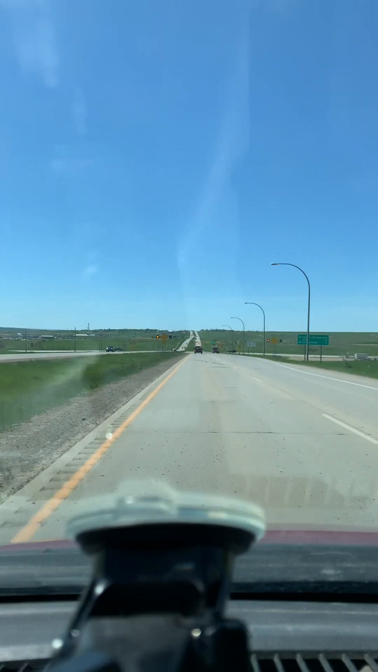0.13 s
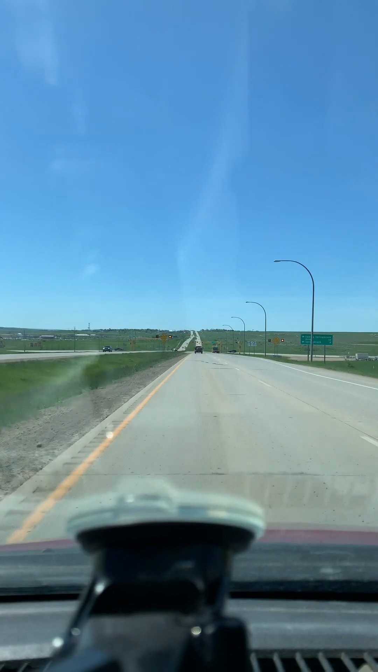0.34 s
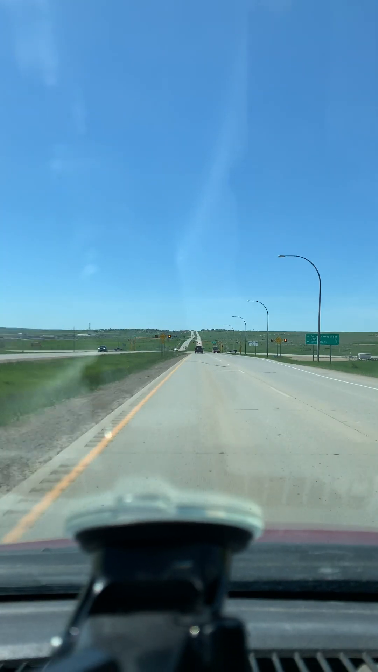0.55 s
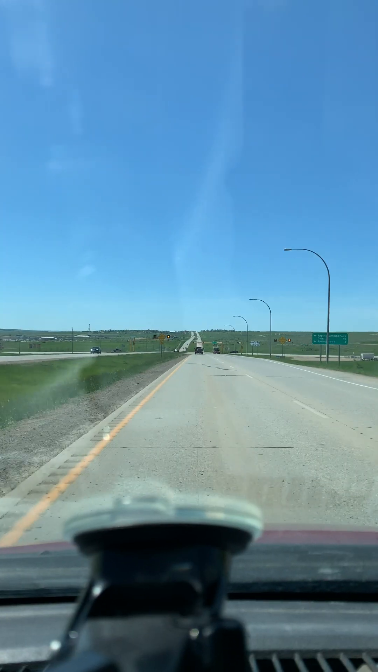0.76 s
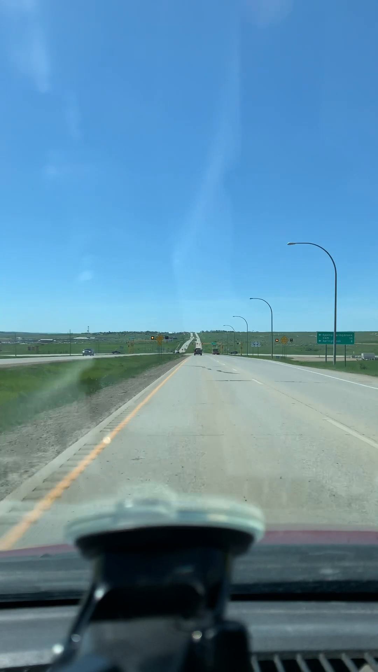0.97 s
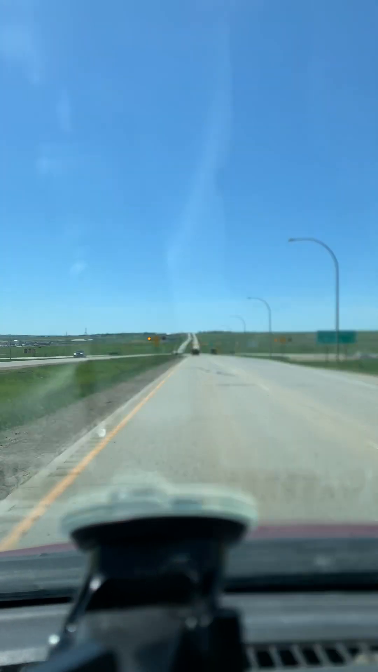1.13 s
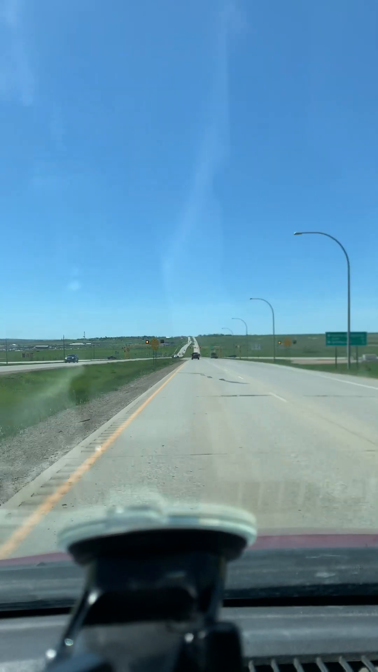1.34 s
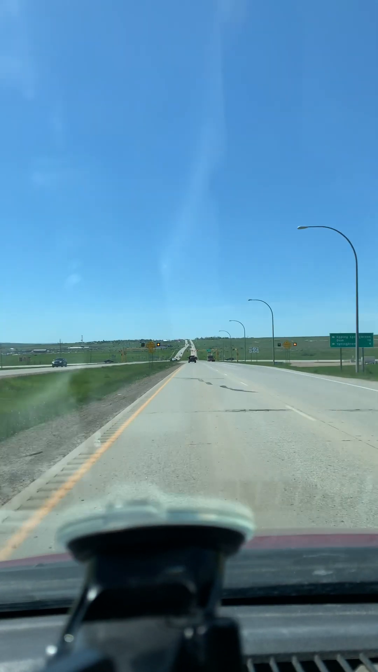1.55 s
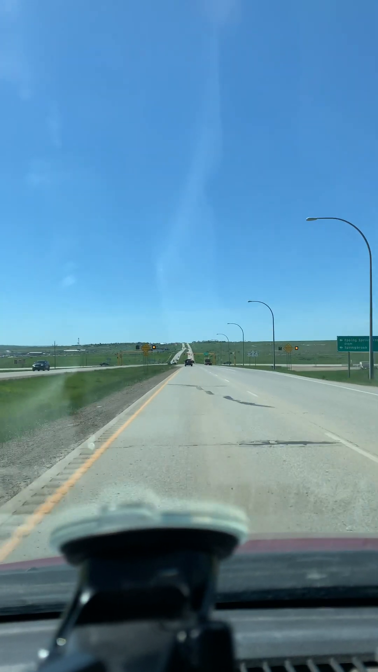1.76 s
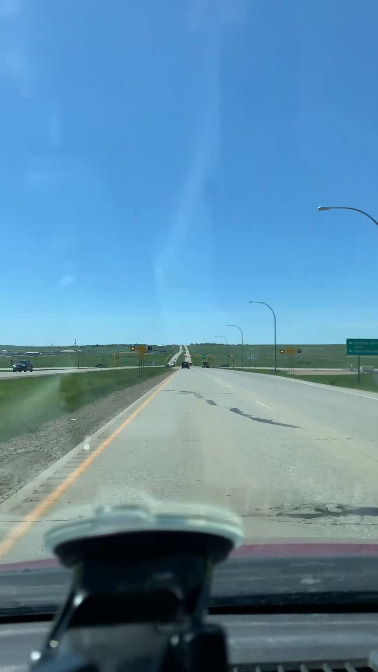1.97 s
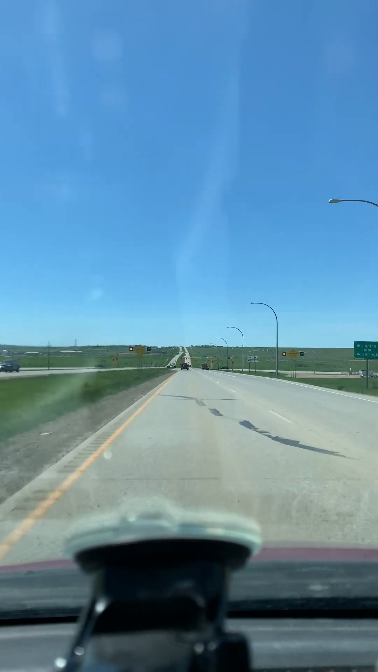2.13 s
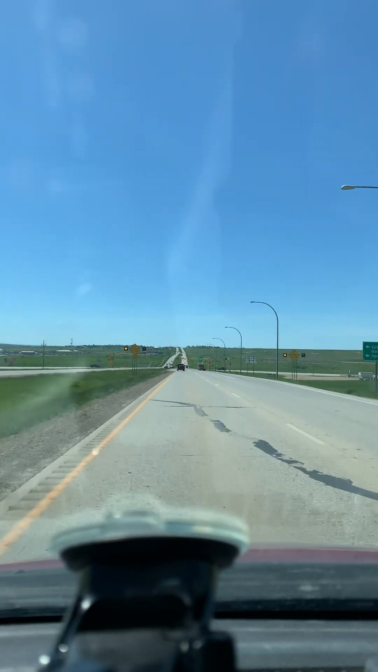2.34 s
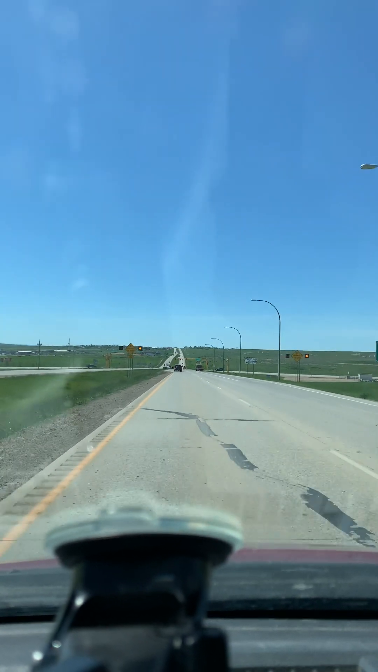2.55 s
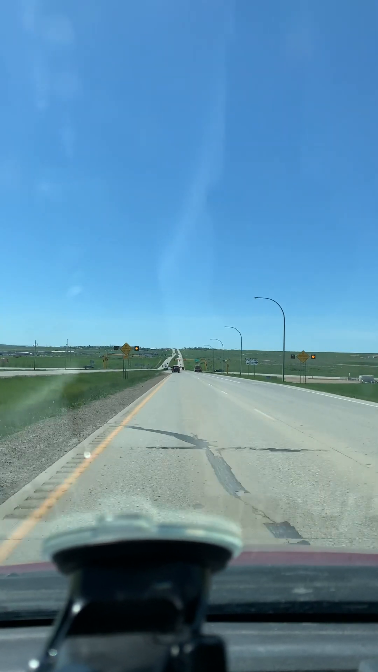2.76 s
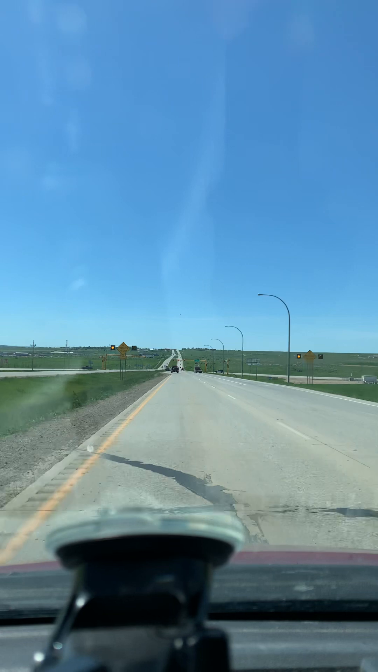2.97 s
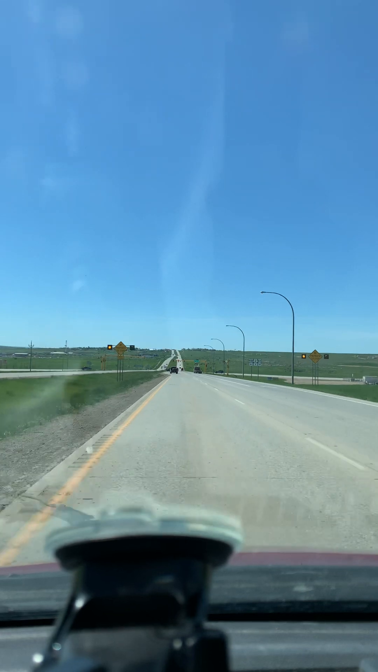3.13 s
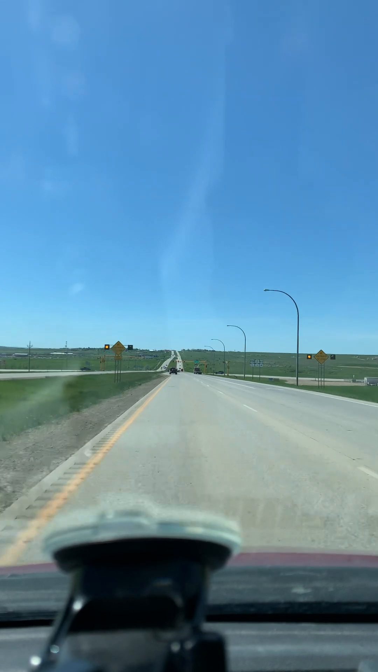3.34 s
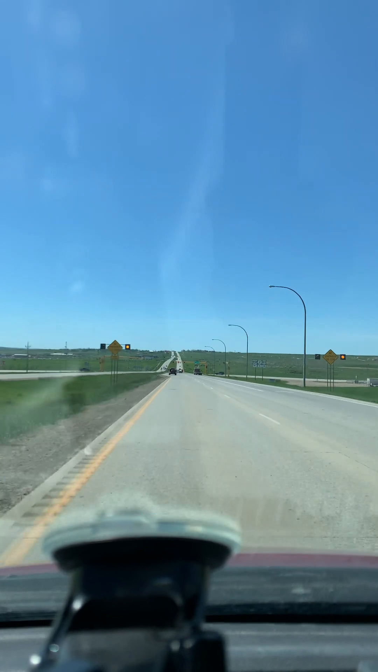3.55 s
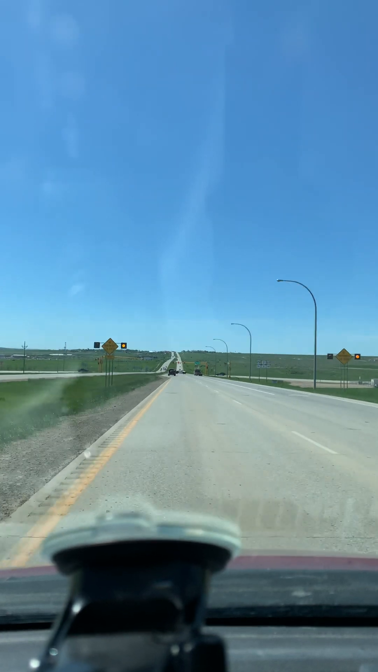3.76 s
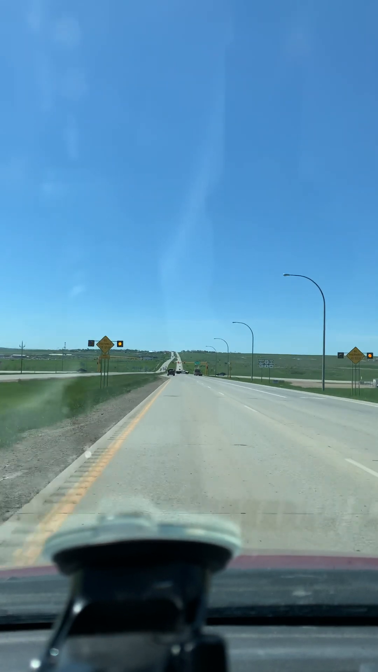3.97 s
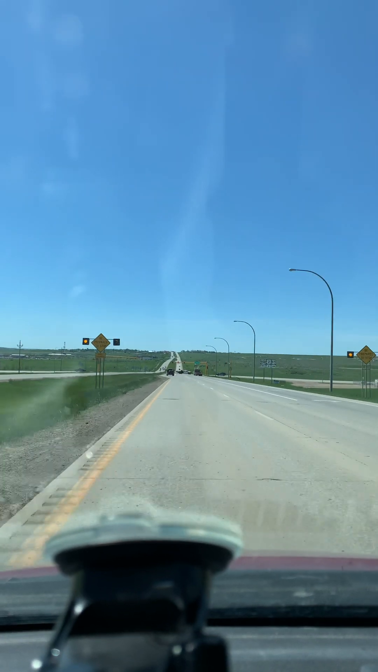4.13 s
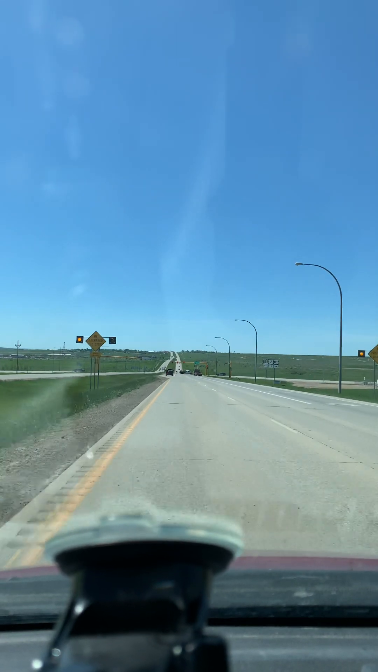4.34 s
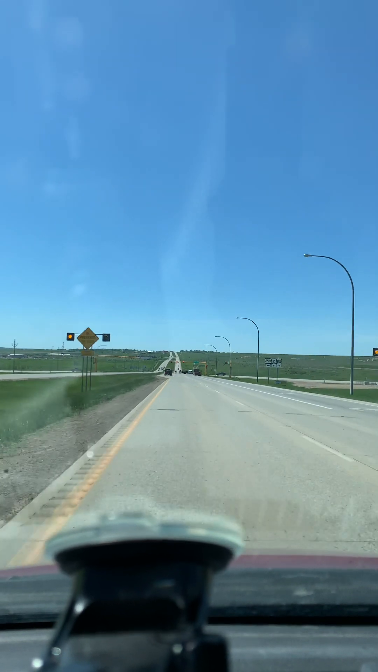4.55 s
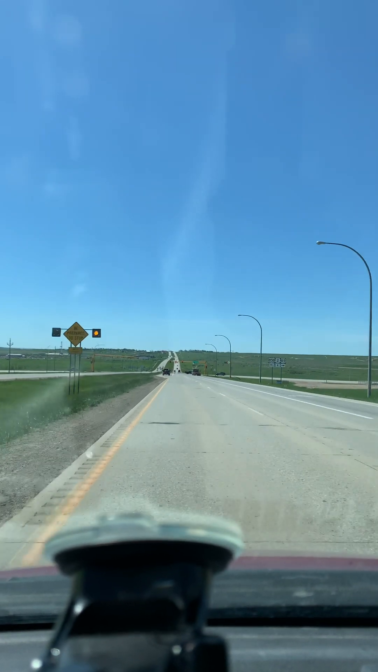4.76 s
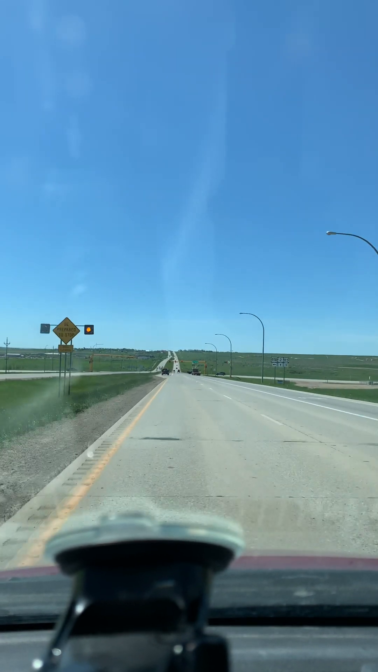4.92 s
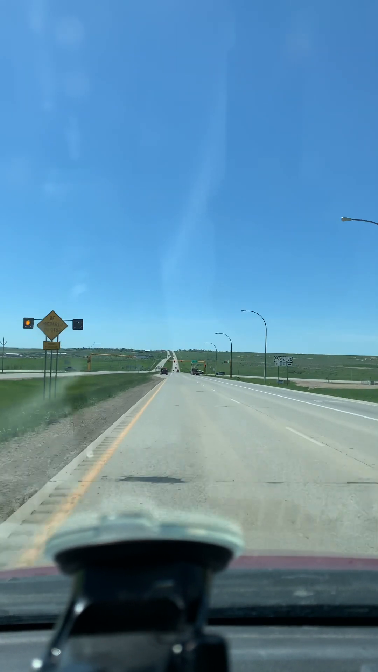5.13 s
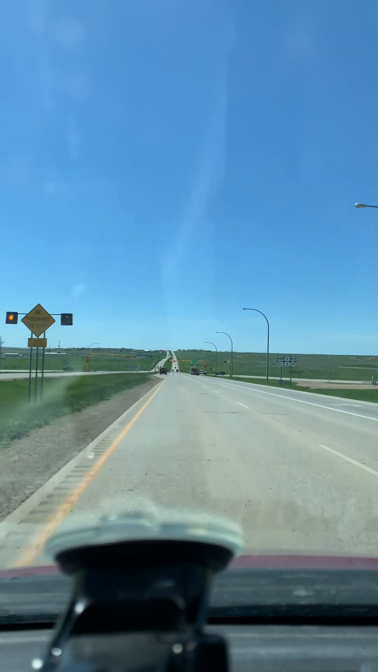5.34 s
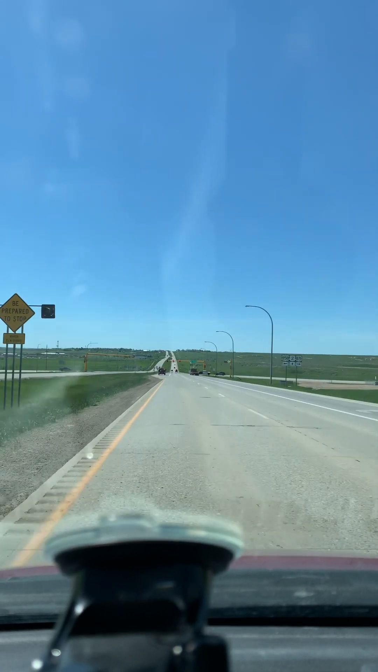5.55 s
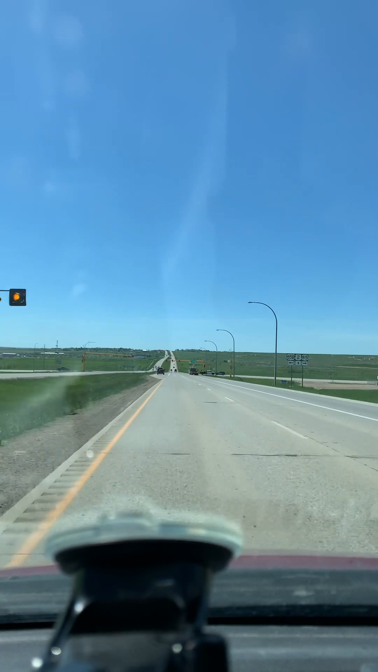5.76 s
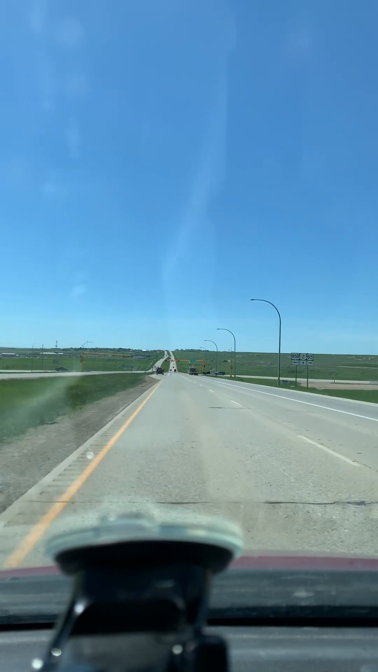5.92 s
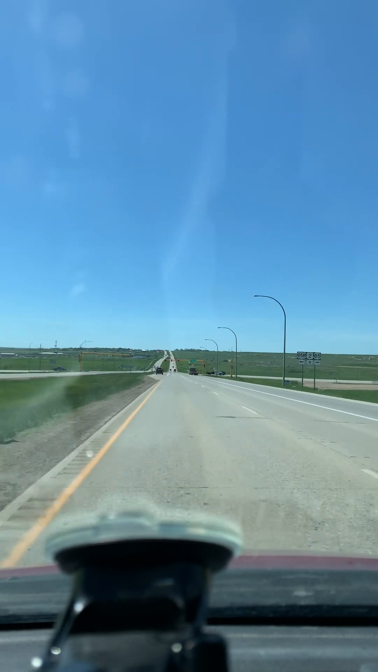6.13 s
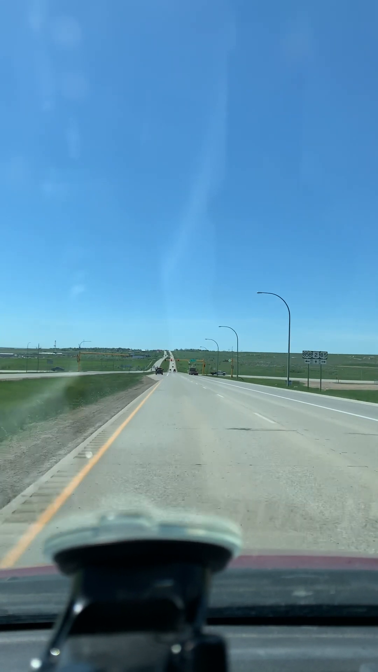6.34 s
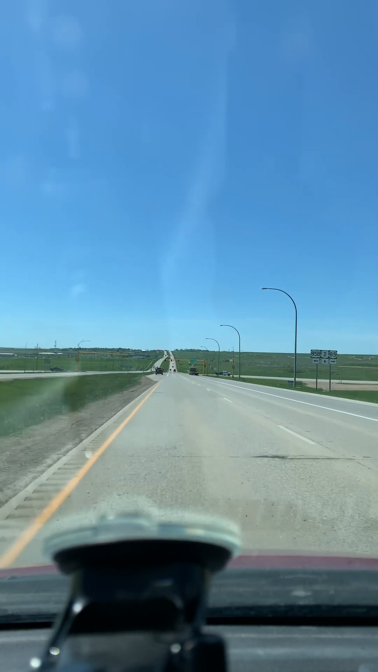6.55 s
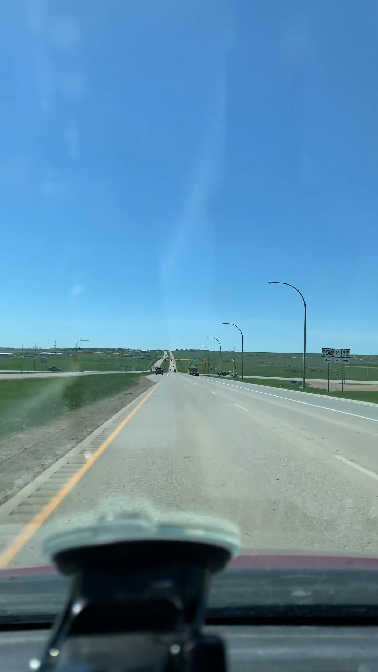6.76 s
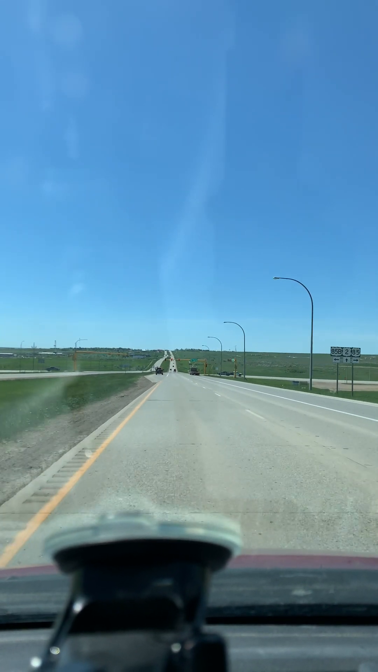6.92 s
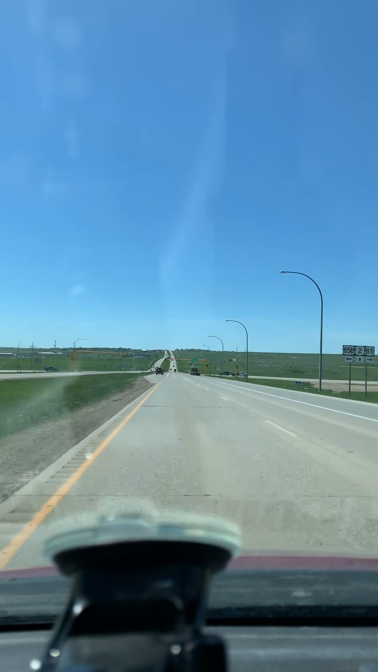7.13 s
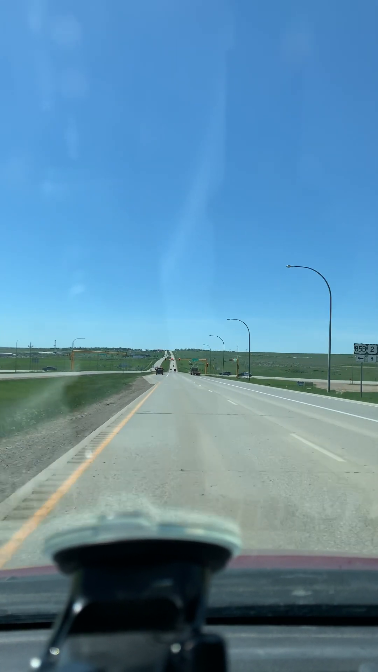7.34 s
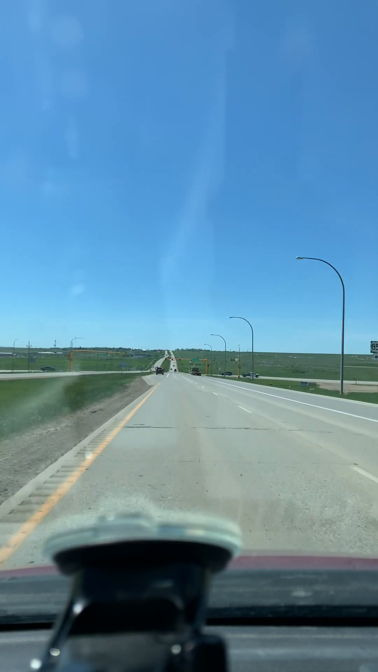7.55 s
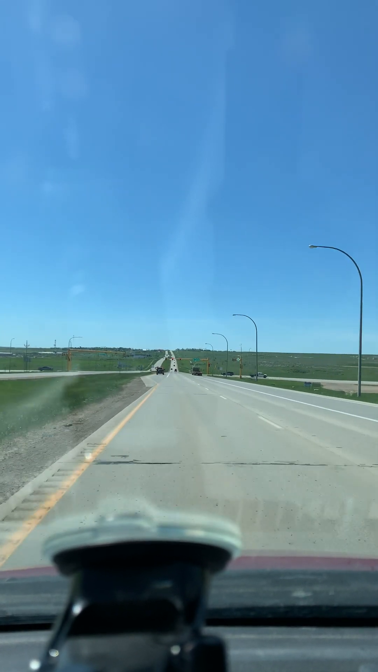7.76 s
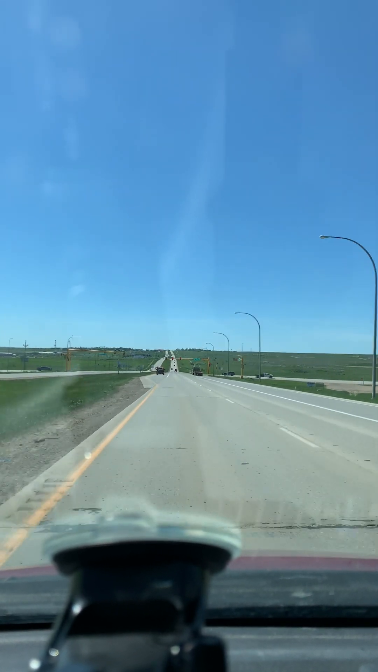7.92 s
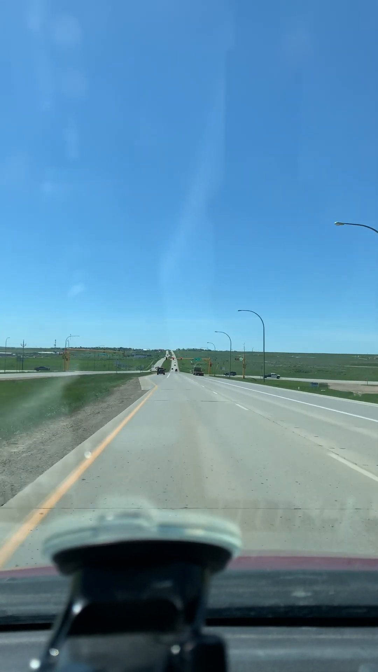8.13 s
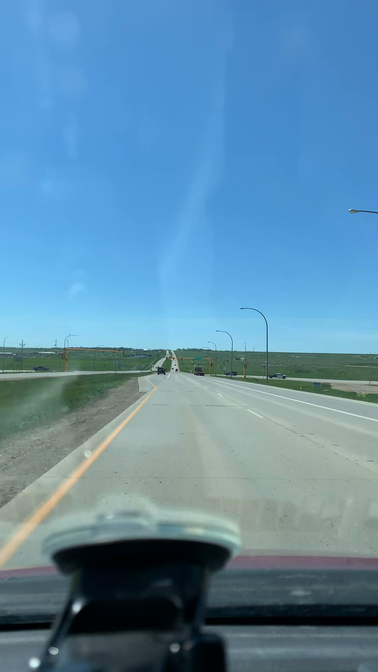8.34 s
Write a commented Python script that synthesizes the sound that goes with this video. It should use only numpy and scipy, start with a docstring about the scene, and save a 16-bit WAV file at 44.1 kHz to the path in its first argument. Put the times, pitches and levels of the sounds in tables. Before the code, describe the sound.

A close stereo phone pickup in a moving car on a highway. Throughout, deep, boomy road rumble fills the cabin, with tyre roar, muffled air over the windscreen and low engine hum. A soft brush on the holder comes at 0.9 s, then a very loud plastic knock and sharp click at 1.15 s, with lighter taps to 1.3. More blows follow at 1.5, 2.1, 2.3 and 2.5, a hard double at 2.7, and a fading cluster of taps until 3.05, with short rattles and dull dashboard thumps; the hardest duck the rumble. Engine pitch sinks between 1.7 and 3.5 s while low bumps swell over cracks. Faint switch clicks sound at 3.85 and 4.13, around a faint whine rising from 3.4 to 4.1. Steady cruising follows. At 7.1-7.2 the stalk clicks and clunks, and quiet indicator ticks fall at 7.13, 7.49, 7.83 and 8.18, with a final road bump near 8.2.

```python
"""A phone in a dashboard holder is handled in a car on a highway, close to its two microphone ports:
damped modes and short noises make the plastic knock and click and the dashboard thump; loud blows duck the limiter.
All around in the cabin, shaped noise is road rumble and air over the glass, and sine tones are the engine's hum.
A faint whine rises briefly. Near the end the indicator stalk is pushed and the indicator ticks, as ringing modes."""
import sys
import numpy as np
from scipy import signal
from scipy.fft import rfft, irfft, next_fast_len
from scipy.io import wavfile
from scipy.ndimage import uniform_filter1d, minimum_filter1d, map_coordinates

SR = 44100
rng = np.random.default_rng(int(sys.argv[2]) if len(sys.argv) > 2 else 0)


def master(y):
    """Save y as 16-bit WAV."""
    cut = np.clip(np.atleast_2d(y).T, -1, 1)
    pcm = np.round(cut * 32767)  # scale
    wavfile.write(sys.argv[1], SR, pcm.astype(np.int16))


N = 374409
TIME = np.arange(N) / SR  # s, the whole scene
BRIEF = np.arange(SR // 5) / SR  # s, the length of one contact

# Spectra are relative, as each noise is later scaled to rms 1 or energy 1.
# faint high pulsing: [f/Hz, peak level/dB]
PULSING = [(5950, -80), (13950, -80.5)]
PULSE_START_S, PULSE_GAP_S, PULSE_WIDTH_S = .017, .0803, .008
# faint hiss, spectrum: [f/Hz, level/dB]
HISS_SPECTRUM = [(3000, -21), (5000, -8), (5750, -1.5), (6200, -1.5), (7500, -7.5), (9300, -14.5),
                 (10400, -5), (11050, 4.5), (11800, -16), (13300, -13.5), (14300, -12), (16000, -18.5)]
HISS_DB = -82
# air rushing over the glass, spectrum: [f/Hz, level/dB]
AIR_SPECTRUM = [(500, -29), (780, -1.5), (900, 5), (1050, 0), (1200, 2), (1380, -6.5), (1550, -1.5),
                (1750, -6), (1950, -6.5), (2150, -13.5), (2300, -17), (2650, -20.5), (3000, -20.5),
                (3800, -25), (4250, -32), (4700, -57.5), (7000, -46), (16000, -82.5)]
# air rushing over the glass, course: [t/s, level/dB]
AIR_LEVEL = [(0, -48.5), (2.5, -45.5), (3.4, -49), (6, -48), (7.4, -46.5), (8.49, -47)]
# tyres through the floor, spectrum: [f/Hz, level/dB]
ROAR_SPECTRUM = [(65, -35), (110, 0), (194, -4.5), (262, -8.5), (300, -12), (340, -11.5), (499, -18.5),
                 (539, -20), (720, -27), (850, -26.5), (1100, -45.5), (1430, -64), (2420, -120)]
ROAR_DB, ROAR_FOLLOWS = -28, 0.14  # mean level; dB of roar for each dB of shaking
# rumble of the car body, spectrum: [f/Hz, level/dB]
BOOM_SPECTRUM = [(20, -86), (40, -19.5), (55, 7), (64, 3.5), (80, 2.5), (95, 2.5), (108, -13.5),
                 (125, -9.5), (170, -26), (300, -93.5), (500, -120)]
# lowest mode of the cabin air, spectrum: [f/Hz, level/dB]
DRUM_SPECTRUM = [(8, -82.5), (15, -32.5), (24, -21), (30, -21.5), (38, -5.5), (45, 6), (51, 7.5), (55, 1.5),
                 (61, -7), (80, -51), (140, -120)]
DRUM_DB, BOOM_DB = -5, -3  # re the shaking
# how hard the road surface shakes the car: [t/s, level/dB]
SHAKE = [(0, -19.5), (.6, -21.5), (1.2, -19), (2.3, -17.5), (2.75, -19.5), (3.6, -20.5), (4.1, -18),
         (4.45, -21.5), (5.3, -18.5), (6.1, -21), (6.75, -23), (7.1, -20.5), (7.8, -21), (8.1, -16.5),
         (8.49, -17.5)]
# likeness of left and right in surrounding noise: [f/Hz, correlation]
LIKENESS = [(30, 0.94), (100, 0.9), (300, 0.8), (700, 0.1), (1500, 0.14), (4000, 0.086), (10000, 0.41)]
# tyres crossing dips and patched cracks: [t/s, level/dB, centre f/Hz, rise/s, fall/s]
BUMPS = [(.35, -21, 82, 0.12, .12), (.729, -16.5, 59.4, 0.078, 0.18), (.97, -24, 85, 0.041, .06),
         (1.56, -18.5, 80.5, .034, 0.094), (2.289, -17.5, 100, 0.045, 0.09), (2.43, -14.5, 48.6, .1, 0.081),
         (3.06, -13, 90, 0.078, 0.1), (3.291, -21.5, 139.4, 0.048, 0.066), (3.569, -18, 51.3, .12, 0.18),
         (6.448, -36, 219, 0.12, 0.24), (8.2, -20, 99.3, 0.046, 0.19), (8.219, -25, 209, 0.057, .24)]
# engine: [t/s, firing f/Hz, firing tone level/dB, its octave level/dB]
ENGINE = [(0, 72.9, -36, -29.5), (1.1, 73.56, -30.5, -32), (1.7, 72.05, -36.5, -33.5),
          (2.1, 67.15, -24.5, -42), (2.45, 59, -15, -35.5), (2.8, 53.4, -38, -46), (3.5, 50.77, -16, -41),
          (4.2, 51.14, -22, -54.5), (5.5, 52.92, -31, -44), (6.5, 54.08, -33, -48),
          (8.49, 50.5, -32, -37.5)]
# driveline drone: [t/s, f/Hz, level/dB]
DRONE = [(0, 83, -60), (5.2, 82.4, -38), (6, 85.37, -35.5), (7.5, 82, -26), (8.49, 83.8, -32.5)]
# faint whine: [t/s, f/Hz, level/dB]
WHINE = [(3.35, 750, -70), (3.55, 756, -48), (3.78, 767.3, -42.5), (3.92, 781, -46), (4.04, 802, -46),
         (4.15, 810, -74)]
# soft brushing on the holder: [t/s, level/dB, centre f/Hz, width/octaves, rise/s, fall/s]
BRUSHES = [(0.019, -57, 3410, 0.17, 0.094, 0.22), (0.88, -50.5, 2220, 0.18, 0.026, 0.061),
           (0.881, -36, 906, 0.52, 0.031, 0.11), (3.861, -70.5, 3480, .2, 0.023, 0.032),
           (4.152, -71, 6210, 0.6, 0.029, 0.082), (4.332, -77, 9060, 0.77, 0.13, 0.064)]
# switches by the steering wheel:
# [t/s, snap level/dB, dull above f/Hz, body, clunk and spring levels/dB re snap]
SWITCHES = [(3.851, -55, 4350, -9.5, -19.5, 4.5), (4.127, -50, 7430, -13, -21, -7),
            (7.08, -49, 10760, 2, -13, -9), (7.191, -48, 11670, 7, 14.5, -5)]
# snap of a switch, spectrum: [f/Hz, level/dB]
SNAP_SPECTRUM = [(1200, -21.5), (2300, -6), (3000, 4), (3500, 7.5), (5500, 3.5), (7500, 3.5), (10000, 0),
                 (15500, -9.5)]
# body of a switch, spectrum: [f/Hz, level/dB]
SWITCH_BODY = [(250, -13), (600, -10), (800, -5.5), (1100, 2), (1700, -2.5), (2600, -13), (3500, -28.5)]
# steering column modes: [f/Hz, level/dB, t60/s]
COLUMN_MODES = [(598.7, 4, 0.079), (647, -2, 0.069), (483, -1, 0.043), (1030, -12, 0.047)]
# detent spring modes: [f/Hz, mean level/dB, t60/s]
SPRING_MODES = [(3090, -9, .06), (3500, -1.5, 0.09), (4160, -23.5, 0.077)]
# indicator ticks: [t/s, level/dB]
TICKS = [(7.133, -51.5), (7.486, -50.5), (7.834, -52), (8.183, -51)]
# indicator relay modes: [f/Hz, mean level/dB, t60/s]
RELAY_MODES = [(1870, -2, 0.016), (2370, -3, 0.047), (2505, -7, .025), (2780, -5, .03), (4760, -5, .022),
               (5960, -1.5, .022)]
# scattered sound of the relay case, spectrum: [f/Hz, level/dB]
RELAY_CASE = [(1500, -18.5), (2500, -1.5), (2800, -5.5), (3200, -16.5), (4300, -18), (4800, -15),
              (5400, -27), (5950, 1.5), (6300, -27), (8000, -40.5)]
# blows and light taps on the holder: [t/s, level/dB, ring f/Hz, thud f/Hz, thud level/dB re blow,
# clack level/dB re blow, click level/dB, thump level/dB re blow, click tilt/(dB per octave)]
KNOCKS = [(1.127, -17.5, 688, 446.6, -8, -15, -35.5, -16, -5.5),
          (1.139, -18, 672.4, 438.5, -9.5, -10.5, -10.5, -14, -1.5),
          (1.1503, 6.5, 665, 403, -4, -13, 9.5, -6.5, 0.5),
          (1.2162, -38, 750, 402, -10, -14.5, -23, -21, 1.5),
          (1.264, -19.5, 770, 441.4, -12, -12.5, -17, -19, 1),
          (1.276, -10.5, 772, 441.7, -8, -15, -21.5, -17.5, -1),
          (1.286, -14.5, 715, 436.5, -6.5, -20, -16, -14.5, -1),
          (1.334, -27, 794, 417.3, -18.5, -12.5, -44, -15.5, 0),
          (1.5342, -5, 817, 318.6, -16.5, -15.5, -21.5, -21, -1.5),
          (1.552, -18, 816, 454, -11.5, -11.5, -36.5, -16, -3.5),
          (1.571, -17, 850, 414, -13, -20.5, -42, -15, -10.5),
          (1.578, -12, 782, 288, 1.5, -24.5, -35.5, 1, -3.5),
          (1.7121, -15, 687, 473, -5, -18.5, -42, -12.5, -3),
          (1.7998, -25.5, 780, 354, -5, -1.5, -34.5, -15, -12),
          (2.013, -25.5, 740, 395, -5.5, -12.5, -50, -15, -4.5),
          (2.0338, -26.5, 744, 391, -7, -12.5, -31.5, -8.5, -4),
          (2.0773, 1, 809, 455.5, -7.5, -18.5, -3.5, -21, 0),
          (2.164, -23, 830, 433, -12.5, -15, -33, -12, 5.5),
          (2.179, -16.5, 900, 443.3, -11, -9.5, -24, -18, -3.5),
          (2.184, -24, 867, 438, -12, -11.5, -21, -15.5, -2.5),
          (2.202, -6.5, 779, 515.7, -7.5, -10, -13.5, -16.5, -8.5),
          (2.308, -22.5, 768, 438.6, -16, -21, -34.5, -17.5, -5),
          (2.333, 0, 782, 377, -21, -11.5, -10, -22, 2),
          (2.3646, -18.5, 677, 434, -9.5, -13.5, -40, -15.5, -3.5),
          (2.386, -18, 717, 436, -8.5, -13, -41.5, -17, 0), (2.407, -16, 731, 440, -9, -11, -46, -18, -3.5),
          (2.4824, 2, 767, 358.3, -9, -22.5, -10.5, -7.5, -2),
          (2.578, -21, 769, 420, -17, -13.5, -10.5, -17, -4.5),
          (2.6821, 0, 835.5, 319.8, -4.5, -22, -0.5, -12, -1),
          (2.6864, -2.5, 830, 442, -2, -19.5, -22.5, -13, -0.5),
          (2.706, -19, 804, 425, -10.5, -13.5, -13.5, -17.5, -0.5),
          (2.712, -11.5, 758, 426, -8.5, -14.5, -30.5, -19, -3.5),
          (2.729, -34, 759, 437, -7, -9, -18.5, -17.5, -3.5),
          (2.785, -10.5, 700, 454, -11.5, -15.5, -30.5, -18, -3),
          (2.792, -11.5, 776, 449, -10.5, -20, -17, -15.5, 0.5),
          (2.8388, -18.5, 680, 455, -20, -17.5, -47.5, -18, -4.5),
          (2.9641, -16, 716, 425, -4, -12, -11.5, -19.5, 1.5),
          (2.9678, -10.5, 760, 417, -7, -22, -29.5, -20, 0),
          (2.9768, -18.5, 800, 439, -4, -1, -44, -16.5, -3),
          (2.9841, -19.5, 772, 447, -10.5, -5.5, -34, -14.5, -1),
          (3.005, -15, 890, 442, -10, -12.5, -32, -13, -2.5),
          (3.017, -16, 877, 443, -8.5, -6.5, -39.5, -15.5, -4.5),
          (3.0324, -11.5, 705, 400, -6.5, -7.5, -29.5, -8, -4)]
# clamp modes: [multiple of the ring f, mean level/dB, t60/s at looseness 1]
CLAMP_MODES = [(.86, -19, .028), (1, -1.5, .025), (1.12, -17, 0.031), (1.75, -37.5, 0.018)]
# arm modes: [multiple of the thud f, mean level/dB, t60/s at arm looseness 1; the arm is 1.7 times as loose as
# the blow]
ARM_MODES = [(.76, -6.5, .016), (1, 1, .018), (1.3, -15, 0.035)]
# clack of the holder's shell, spectrum: [f/Hz, level/dB]
SHELL_SPECTRUM = [(400, -17), (900, 2.5), (1200, 1.5), (1400, 5.5), (1750, -7.5), (2000, -16), (2400, -16),
                  (2800, -33.5), (5000, -54)]
# click of hard plastic, spectrum before tilt: [f/Hz, level/dB]
CLICK_SPECTRUM = [(700, -19), (1500, 0.5), (2200, 7.5), (2700, -9), (3500, 5), (4500, 8.5), (5400, 4),
                  (6200, 2), (6950, 0), (7500, -7.5), (8200, -2), (10000, 4.5), (12300, -1.5), (12900, -2),
                  (13600, -5.5), (15500, -5.5), (16300, -18.5)]
TILT_HZ = 5000  # the click tilt pivots here
REPEAT_S, REPEAT_DB = .0004, -7  # nominal gap between snaps of a click, change from each to the next
THUMP_HZ, THUMP_T60 = 136.6, 0.089  # the dashboard under the holder
GLASS_S, GLASS_DB = 0.0034, -13  # the windscreen's echo: typical delay, level re blow
# near sounds at the two microphone ports: [f/Hz, phase by which left leads/rad]
PORT_LEAD = [(150, -.2), (400, -.8), (1300, -1), (1900, 0), (3000, 1.4), (3800, 1.7), (4600, 3.1),
             (6950, 6.3), (8850, 9.4), (11000, 12.6), (13150, 15.7), (15500, 19), (16400, 18.6)]
FADE_S, TOP_HZ = .02, 16400  # closing fade, band limit of the phone


def amp(db):
    """Decibels to gain."""
    return 10 ** (np.asarray(db) / 20)


def unit(x):
    """Scaled to rms 1."""
    return x / np.sqrt(np.mean(x ** 2) + 1e-20)


def along(points, hz):
    """[f/Hz, value] points read on a log frequency axis."""
    f, v = np.transpose(points)
    return np.interp(np.log(hz + 1), np.log(f + 1), v)


def curves(rows):
    """One value per sample for each column after the time."""
    s, *cols = np.transpose(rows)
    return [np.interp(TIME, s, c) for c in cols]


def wobble(rate):
    """A smooth random curve, rate knots a second."""
    knots = rng.standard_normal(int(N * rate / SR) + 4)
    return map_coordinates(knots, [TIME * rate])


def phase(hz):
    """Running phase of a pitch curve, in radians."""
    return 2 * np.pi * np.cumsum(hz) / SR


def filtered(x, response):
    """x times a response of frequency, padded so that tails do not wrap round."""
    n = x.shape[-1]
    m = next_fast_len(n + 8192)
    return irfft(rfft(x, m) * response(np.fft.rfftfreq(m, 1 / SR)), m)[..., :n]


def band(centre_hz, octaves):
    """A bell-shaped response."""
    return lambda hz: np.exp(-.5 * (np.log2((hz + 1) / centre_hz) / octaves) ** 2)


def shape(spectrum):
    """The response of [f/Hz, level/dB] points."""
    return lambda hz: amp(along(spectrum, hz))


def uneven(spectrum, depth_db):
    """A spectrum with new peaks and dips: each contact point favours other resonances."""
    knots = np.clip(depth_db * rng.standard_normal(64), -5, 5)
    knot_hz = np.linspace(0, SR / 2, len(knots))
    return lambda hz: shape(spectrum)(hz) * amp(np.interp(hz, knot_hz, knots))


def puff(response):
    """A brief coloured noise of rms 1."""
    return unit(filtered(rng.standard_normal(len(BRIEF)), response))


def both_ports(response, apart_db):
    """A brief stereo noise: a shared part and, apart_db re that, a part of each port's own."""
    own = np.array([puff(response), puff(response)])
    return unit(puff(response) + amp(apart_db) * own)


def rush(response):
    """Long stereo noise of rms 1 from all around, near mono in the bass."""
    def mid_side(hz):
        turn = np.arccos(np.clip(along(LIKENESS, hz), -1, 1)) / 2
        return response(hz) * np.array([np.cos(turn), np.sin(turn)])
    mid, side = filtered(rng.standard_normal((2, N)), mid_side)
    return unit(np.array([mid + side, mid - side]))


def steadied(x, seconds):
    """Noise with its slow chance swells evened out."""
    power = uniform_filter1d(np.mean(x ** 2, axis=0), int(seconds * SR))
    return x / np.sqrt(np.abs(power) + 1e-9)


def cabin(x, ripple_db, patchy_db):
    """Reflections comb the noise with fixed narrow peaks; turbulence adds passing patches."""
    z = signal.stft(x, nperseg=2048)[2]
    ripple = unit(uniform_filter1d(rng.standard_normal((z.shape[1], 1)), size=2, axis=0))
    across_hz = uniform_filter1d(rng.standard_normal(z.shape[1:]), size=7, axis=0)
    patches = unit(uniform_filter1d(across_hz, size=4, axis=1))
    coloured = z * amp(ripple_db * ripple + patchy_db * patches)
    return unit(signal.istft(coloured, nperseg=2048)[1][:, :N])


def swell(s, rise, fall):
    """An envelope that climbs to 1 at time s, then dies away exponentially."""
    return np.exp(-np.where(TIME < s, ((TIME - s) / rise) ** 2, (TIME - s) / fall))


def fade(attack, t60):
    """A struck envelope with top 1; times in s."""
    env = (1 - np.exp(-(BRIEF / attack) ** 2)) * np.exp(-np.log(1000) * BRIEF / t60)
    return env / env.max()


def ring(hz, attack, t60):
    """One damped mode."""
    return np.sin(2 * np.pi * hz * BRIEF) * fade(attack, t60)


def modes(table, hz, attack, looseness, scatter_db):
    """Damped modes at multiples of hz; every blow and each port weights them anew."""
    total = 0
    for ratio, level, t60 in table:
        chance = rng.normal() + 0.29 * rng.standard_normal((2, 1))
        mode_hz = hz * ratio * (1 + rng.normal(0, 0.0061, (2, 1)))
        total = total + amp(level + scatter_db * chance) * ring(mode_hz, attack, t60 * looseness)
    return total


def impulse(response):
    """The causal, minimum-phase answer to a sharp contact, with energy 1."""
    size = 2048
    cepstrum = irfft(np.log(np.maximum(response(np.fft.rfftfreq(size, 1 / SR)), 1e-5)))
    # folding the cepstrum puts all the sound after the contact
    cepstrum[1:size // 2] *= 2
    cepstrum[size // 2 + 1:] = 0
    answer = irfft(np.exp(rfft(cepstrum)))
    return np.pad(answer / np.linalg.norm(answer), (0, len(BRIEF) - size))


def add(track, s, sound):
    """Mixes a sound in at time s."""
    room = track[..., max(round(s * SR), 0):][..., :sound.shape[-1]]
    room += sound[..., :room.shape[-1]]


def pulsing():
    """Two very faint high tones, probably from electronics, pulse about twelve times a second."""
    offset = (TIME - PULSE_START_S + PULSE_GAP_S / 2) % PULSE_GAP_S - PULSE_GAP_S / 2
    tones = sum(amp(db) * np.sin(2 * np.pi * hz * TIME + wobble(90)) for hz, db in PULSING)
    return np.exp(-(offset / PULSE_WIDTH_S) ** 2) * tones


def road():
    """The road surface shakes the cabin air and the floor; air rushes over the glass, over faint hiss."""
    shake_db, = curves(SHAKE)
    air_db, = curves(AIR_LEVEL)
    drum = amp(shake_db + DRUM_DB) * steadied(rush(shape(DRUM_SPECTRUM)), seconds=0.49)
    boom_db = shake_db + BOOM_DB + 2.5 * wobble(9)
    boom = amp(boom_db) * steadied(rush(shape(BOOM_SPECTRUM)), seconds=0.12)
    roar_db = ROAR_DB + ROAR_FOLLOWS * (shake_db - shake_db.mean()) + 0.52 * wobble(6.2)
    roar = amp(roar_db) * cabin(rush(shape(ROAR_SPECTRUM)), ripple_db=0.5, patchy_db=1.8)
    air_noise = cabin(rush(shape(AIR_SPECTRUM)), ripple_db=1.45, patchy_db=2.8)
    air = amp(air_db + 0.24 * wobble(2.5)) * air_noise
    hiss = amp(HISS_DB) * rush(shape(HISS_SPECTRUM))
    return drum + boom + roar + air + hiss


def bumps():
    """Dips and cracks in the road thump through the suspension, as swells of low noise."""
    out = np.zeros((2, N))
    for s, db, hz, rise, fall in BUMPS:
        noise = steadied(rush(band(hz, octaves=0.31)), seconds=0.29)
        out += amp(db) * swell(s, rise, fall) * noise
    return out


def engine():
    """The firing tone and its octave sink as the throttle closes; the driveline drones and whines."""
    firing_hz, tone_db, octave_db = curves(ENGINE)
    turn = phase(firing_hz * (1 + .008 * wobble(7.6)))
    tone = amp(tone_db + 7.5 * wobble(11.0)) * np.sin(turn)
    octave = amp(octave_db + 2.8 * wobble(1.8)) * np.sin(2 * turn)
    drone_hz, drone_db = curves(DRONE)
    drone = amp(drone_db + 1.3 * wobble(7.5)) * np.sin(phase(drone_hz))
    whine_hz, whine_db = curves(WHINE)
    whine_turn = phase(whine_hz * (1 + .008 * wobble(60)))
    whine = amp(whine_db + 2 * wobble(38)) * np.sin(whine_turn)
    return tone + octave + drone + whine


def switch(dull_hz, body_db, clunk_db, spring_db):
    """A switch snaps over its detent, the steering column clunks and the detent spring rings."""
    colour = uneven(SNAP_SPECTRUM, depth_db=7.5)
    # the treble is softened by the cabin
    snap = both_ports(lambda hz: colour(hz) / np.sqrt(1 + (hz / dull_hz) ** 6), apart_db=-4.5)
    body = amp(body_db) * puff(shape(SWITCH_BODY))
    clunk = sum(amp(level) * ring(hz, attack=0.0097, t60=t60) for hz, level, t60 in COLUMN_MODES)
    spring = modes(SPRING_MODES, 1, attack=.004, looseness=1, scatter_db=-1.0)
    return (snap + body) * fade(0.0038, t60=0.08), amp(clunk_db) * clunk, amp(spring_db) * spring


def tick():
    """The indicator relay rings in a few modes and its case scatters a short noise."""
    relay = sum(amp(level + rng.normal(0, 1.7)) * ring(hz, attack=0.0038, t60=t60)
                for hz, level, t60 in RELAY_MODES)
    scatter = amp(-1) * both_ports(shape(RELAY_CASE), apart_db=2.5) * fade(0.003, t60=0.086)
    return relay + scatter


def indicator():
    """Switches by the steering wheel clunk over their detents and the indicator ticks."""
    out = np.zeros((2, N))
    for s, db, *settings in SWITCHES:
        snap, clunk, spring = switch(*settings)
        # each part starts a few milliseconds early, as its attack is gradual
        add(out, s - .007, amp(db) * snap)
        add(out, s - .003, amp(db) * clunk)
        add(out, s - .004, amp(db) * spring)
    for s, db in TICKS:
        add(out, s - .004, amp(db) * tick())
    return out


def brushes():
    """Something slides softly over the holder: swells of banded noise."""
    return sum(amp(db) * swell(s, rise, fall) * rush(band(hz, width))
               for s, db, hz, width, rise, fall in BRUSHES)


def click(tilt_db):
    """A soft noise swells around a sharp snap, which starts 4 ms in and repeats twice, weaker."""
    def response(hz):
        return shape(CLICK_SPECTRUM)(hz) * amp(tilt_db * np.log2(np.maximum(hz / TILT_HZ, .5)))
    softness = amp(-35.5) * fade(0.0046, t60=.034) + amp(-48.5) * fade(.01, t60=.081)
    sound = both_ports(response, apart_db=-2.5) * softness
    # the windscreen scatters the snap
    burst = both_ports(response, apart_db=-11) * fade(.0003, t60=0.0023)
    add(sound, .004, amp(-19.5) * burst)
    snap = amp(-3) * impulse(response)
    for k, slack in enumerate(rng.uniform(0.7, 0.96, size=3)):
        add(sound, .004 + k * slack * REPEAT_S, amp(k * REPEAT_DB) * snap)
    return sound


def knock(db, hz, thud_hz, thud_db, clack_db, thump_db):
    """A blow clacks the shell, rings clamp and arm and thumps the dashboard; the windscreen echoes it."""
    looseness = np.clip(0.58 + db / 80, .35, 1.2)  # light taps stay in contact and die sooner
    clamp = modes(CLAMP_MODES, hz, attack=0.0035, looseness=looseness, scatter_db=0.86)
    arm = modes(ARM_MODES, thud_hz, attack=0.0061, looseness=1.7 * looseness, scatter_db=2.5)
    shell = uneven(SHELL_SPECTRUM, depth_db=8.0)
    burst = both_ports(shell, apart_db=-0.5) * fade(0.00055, t60=0.015)
    clack = amp(10) * impulse(shell) + amp(-5) * burst
    thump = ring(THUMP_HZ, attack=0.0024, t60=THUMP_T60)
    blow = amp(db) * (clamp + amp(thud_db) * arm + amp(clack_db) * clack + amp(thump_db) * thump)
    heard = blow.copy()
    add(heard, GLASS_S * rng.uniform(0.64, 1.3), amp(GLASS_DB) * blow)
    return heard


def holder():
    """Each contact on the holder knocks and clicks, with a short low rattle around it."""
    out = np.zeros((2, N))
    for s, db, hz, thud_hz, thud_db, clack_db, click_db, thump_db, tilt_db in KNOCKS:
        add(out, s, knock(db, hz, thud_hz, thud_db, clack_db, thump_db))
        # a short low rattle surrounds each blow
        rattle = both_ports(band(430, octaves=0.82), apart_db=-3.0) * fade(0.0035, t60=0.05)
        add(out, s - .005, amp(db - 19.5) * rattle)
        add(out, s - .004, amp(click_db) * click(tilt_db))
    return out


def ports(x):
    """Near sounds reach the two microphone ports at different moments: a phase lead between them."""
    sides = np.array([[1], [-1]])
    return filtered(x, lambda hz: np.exp(.5j * along(PORT_LEAD, hz) * sides))


def scene():
    """Blows and switches are near the microphone ports; the cabin sounds all around."""
    near = ports(holder() + indicator())
    return near + road() + bumps() + engine() + brushes() + pulsing()


def limiter(x, ceiling_db, hold, release):
    """Gain drops at once on a peak, holds, then glides back; times in s."""
    over_db = np.maximum(20 * np.log10(np.abs(x).max(axis=0) + 1e-9) - ceiling_db, 1e-9)
    size = int(hold * SR) | 1
    held_db = -minimum_filter1d(-over_db, size, origin=size // 2)
    # the deepest recent cut, fading exponentially
    cut_db = np.exp(np.maximum.accumulate(np.log(held_db) + TIME / release) - TIME / release)
    # a 1 ms window rounds the corners of the gain
    gain_db = uniform_filter1d(minimum_filter1d(-cut_db, size=45), size=45)
    return x * amp(gain_db)


def record(dry):
    """The phone limits the peaks and keeps nothing above its band limit; a brief fade closes the sound."""
    ending = np.minimum((TIME[-1] - TIME) / FADE_S, 1)
    limited = limiter(dry, ceiling_db=-0.94, hold=0.096, release=0.038)
    return filtered(ending * limited, lambda hz: hz < TOP_HZ)


dry = scene()
out = record(dry)
master(out)
```